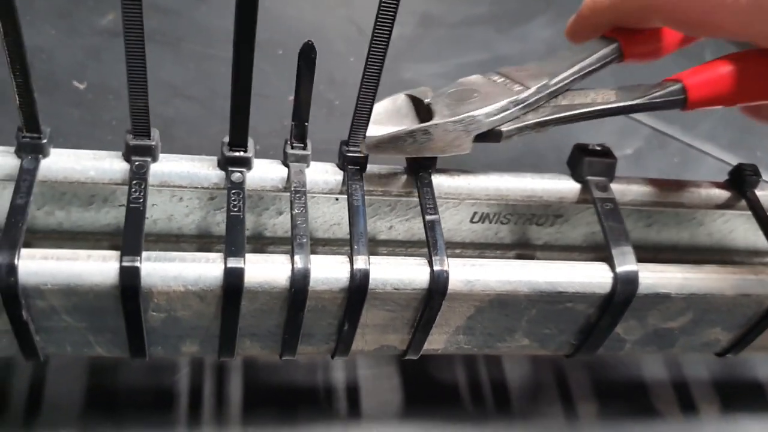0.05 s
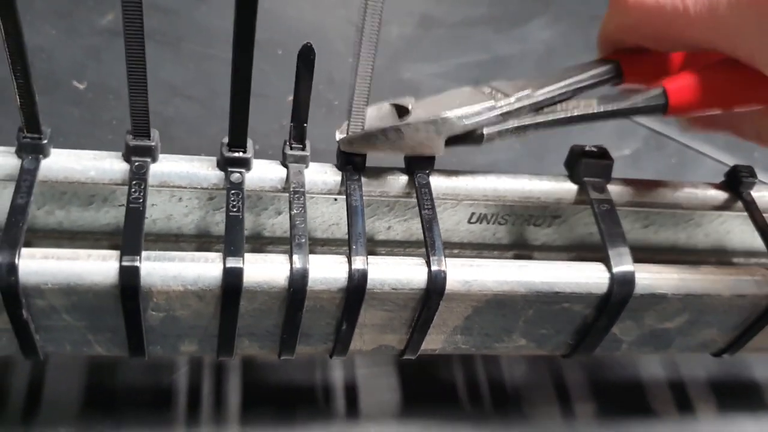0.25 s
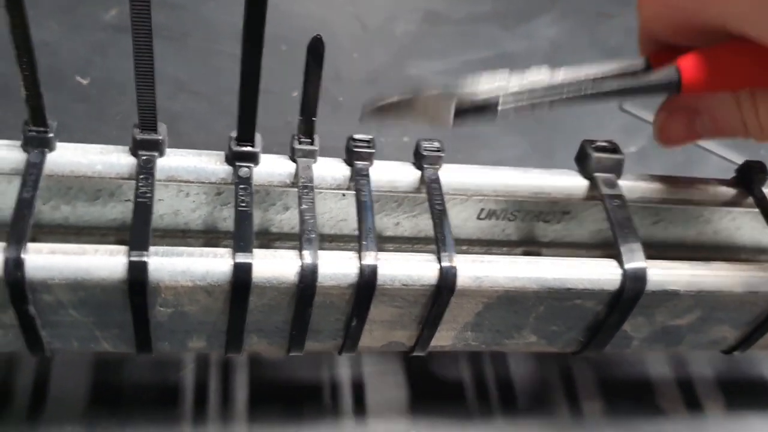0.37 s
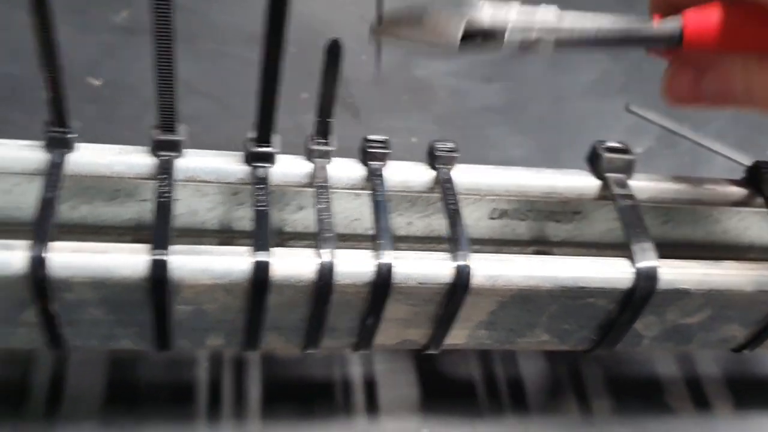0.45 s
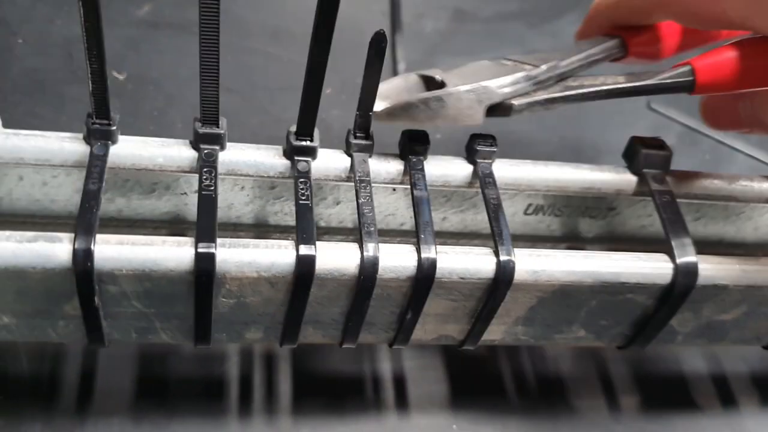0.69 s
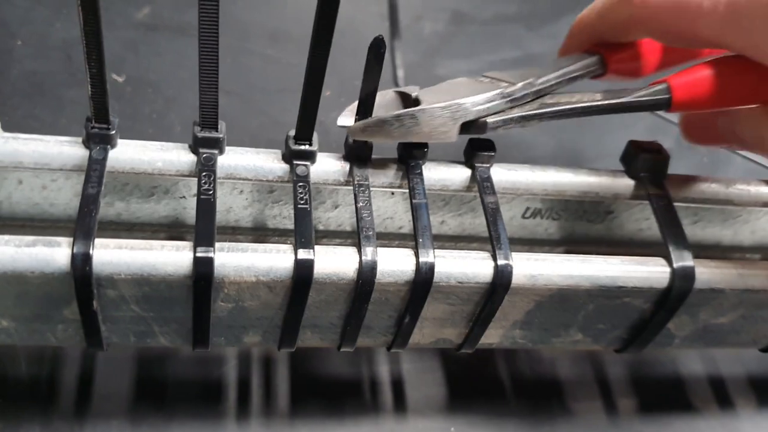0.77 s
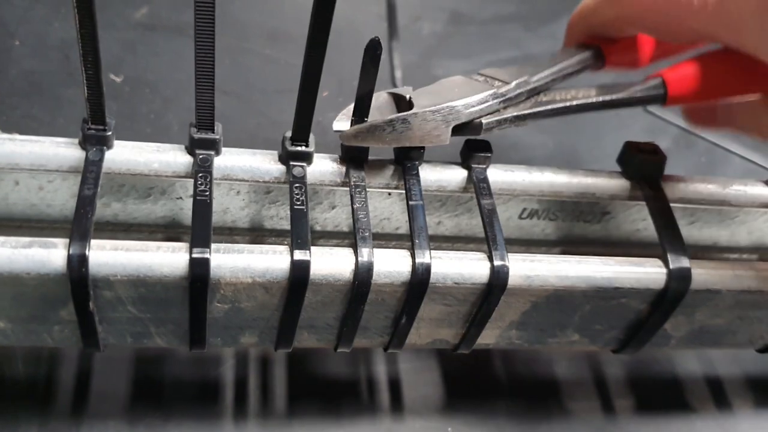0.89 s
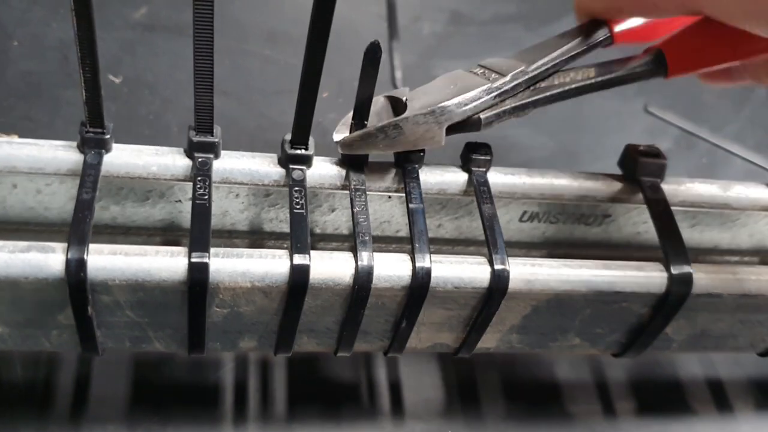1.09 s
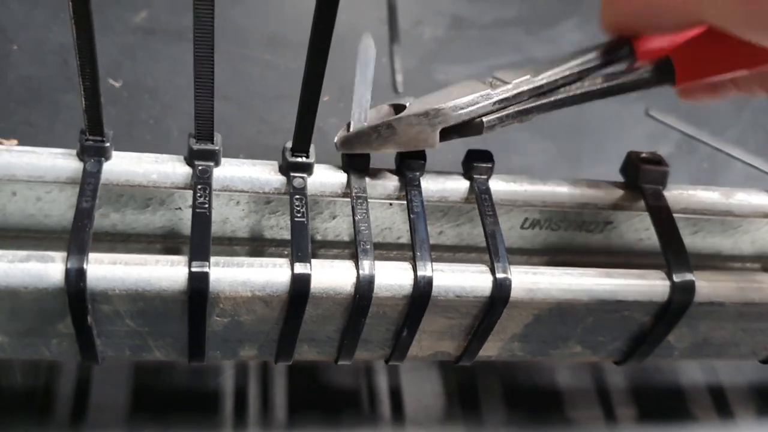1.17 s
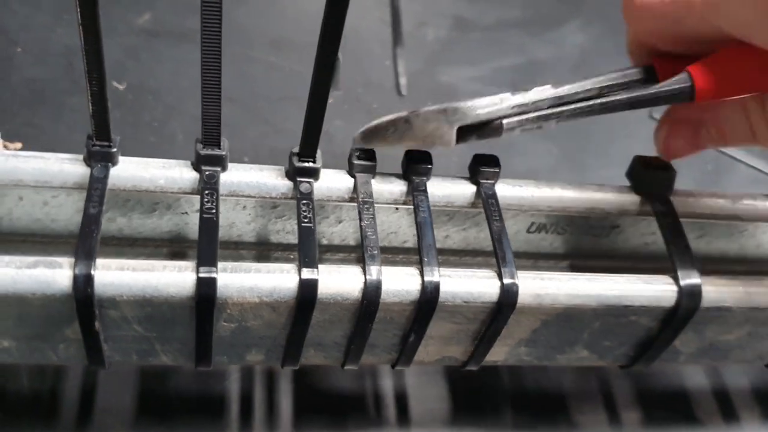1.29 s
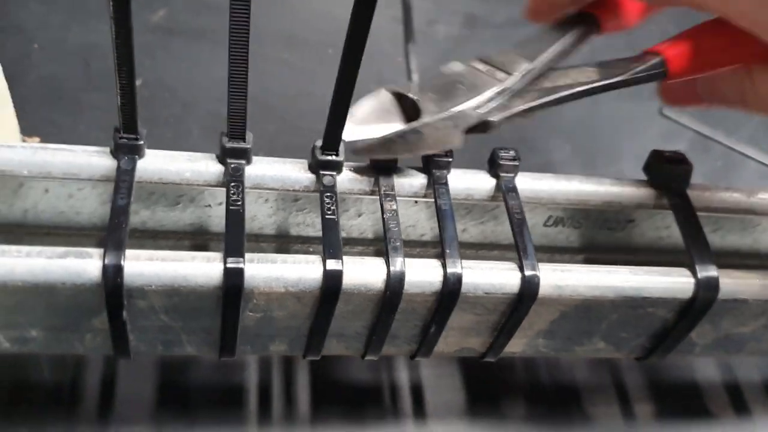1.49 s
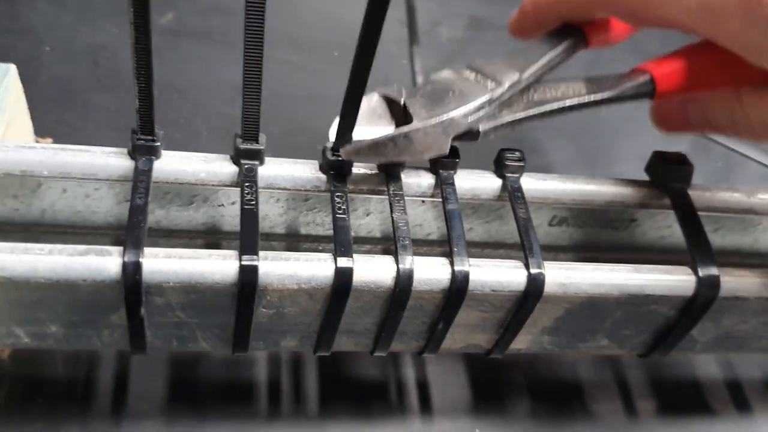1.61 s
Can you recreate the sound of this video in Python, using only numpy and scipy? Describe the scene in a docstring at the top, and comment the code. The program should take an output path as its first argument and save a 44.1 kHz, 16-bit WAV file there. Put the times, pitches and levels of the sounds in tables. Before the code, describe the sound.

Cutters snip two plastic cable ties on a steel channel, close and slightly left in a quiet room. Soft knocks and ticks lead to a sharp crack at 0.4 seconds, with a ping, thump and brief metallic clatter. A faint air puff brushes the right side, and the offcut patters down around 0.6 seconds. More knocks follow from 0.9 seconds, then a second, lighter snap rings briefly at 1.3.

```python
"""Cutters snip two plastic cable ties on a steel channel, close by in a quiet room.
Each tie snaps with a crack, the jaws ping, and the steel thumps and rings. Before each cut
the jaws knock on the channel as they find the tie, then bite with small ticks.
The first offcut lands with a patter, and a puff of air brushes the right microphone
as the hand jerks away."""
import sys
import numpy as np
from scipy import signal
from scipy.fft import rfft, irfft
from scipy.io import wavfile

SR = 44100
rng = np.random.default_rng(int(sys.argv[2]) if len(sys.argv) > 2 else 0)


def master(y):
    """Save y as 16-bit WAV."""
    cut = np.clip(np.atleast_2d(y).T, -1, 1)
    pcm = np.round(cut * 32767)  # scale
    wavfile.write(sys.argv[1], SR, pcm.astype(np.int16))


N = 72765
T = np.arange(int(SR * .9)) / SR  # seconds since one sound began
SNAP_RISE_S = 0.000298

# The two cuts. Each row: start in seconds, crack level in dB, crack length in seconds, ping level in dB,
# shimmer pitch and width in Hz, shimmer level in dB, thump level in dB, push pitch in Hz,
# push fade time in seconds, clatter level in dB.
CUTS = [(0.4262, 6, 0.001, 1.5, 7250, 560, -8, -3, 206, 0.042, 8.5),
        (1.3193, 4, 0.00147, 1.5, 7880, 221, -11.5, -5, 251.7, 0.081, -1)]


def amp(db):
    """Turns decibels (dB) into a number to multiply by."""
    return 10 ** (np.asarray(db) / 20)


def unit(x):
    """Scales a sound to an energy of 1."""
    return x / np.sqrt(np.sum(x ** 2, -1, keepdims=True) + 1e-20)


def read(points, hz):
    """Reads between the rows of a table, giving every octave equal space."""
    row_hz, values = np.transpose(points)
    return np.interp(np.log(hz + 1), np.log(row_hz), values)


def fade(fade_s):
    """Dies away by 60 dB in the fade time."""
    return np.exp(-np.log(1000) * T / fade_s)


def rise(rise_s):
    """Climbs from silence toward full level."""
    return 1 - np.exp(-T / rise_s)


def add(mix, start, sound):
    """Mixes a sound in at a start time in seconds."""
    part = mix[..., max(round(start * SR), 0):][..., :sound.shape[-1]]
    part += sound[..., :part.shape[-1]]


def colour(x, points, tilt_db=0):
    """Shapes the tone with a table of levels, tilted by tilt_db per octave around 4 kHz."""
    hz = abs(np.fft.fftfreq(4096, 1 / SR))
    octaves = np.log2(np.maximum(hz, 500) / 4000)
    log_gain = np.log(amp(read(points, hz) + tilt_db * octaves))
    response = np.exp(np.conj(signal.hilbert(log_gain)))  # never rings ahead of a hit
    taps = np.fft.ifft(response).real[:len(hz) // 2]
    return signal.fftconvolve(x, taps[None] if x.ndim > 1 else taps, axes=-1)[..., :x.shape[-1]]


def diffuse(count, alike_hz=450):
    """Noise at two microphones, alike in the bass only."""
    left, other = rfft(rng.standard_normal((2, count)))
    same = 1 / (1 + (np.fft.rfftfreq(count, 1 / SR) / alike_hz) ** 2)
    return irfft(np.array([left, same * left + np.sqrt(1 - same ** 2) * other]), count)


def room_noise(level_db=-57):
    """The quiet room; the right microphone hears less of its hiss."""
    # The noise's tone, then the change on the right. Each row: frequency in Hz, boost or cut in dB.
    tone = [(20, -21), (60, 5), (120, -9.5), (250, 10), (400, -13.5), (900, -17), (1500, -9.5),
            (3000, -20.5), (4200, -24), (6500, -19), (10000, -37.5), (16000, -37)]
    right_tone = [(60, -1.5), (300, -4), (700, -1.5), (1500, -20.5), (3200, -16.5), (6500, -22),
                  (10000, -2), (16000, 2.5)]
    left, right = amp(level_db) * np.sqrt(N) * unit(colour(diffuse(N), tone))
    return np.array([left, colour(right, right_tone)])


def room_echo(x):
    """Sound comes back from all sides, each frequency dying at its own speed."""
    # How long the room rings. Each row: frequency in Hz, fade time in seconds.
    fade_times = [(80, 0.37), (250, 0.25), (700, 0.61), (3000, 0.59), (7000, 0.38), (14000, 0.5)]
    # How much it sends back. Each row: frequency in Hz, level in dB.
    tone = [(60, 4), (250, -7.5), (600, -9), (1500, -8), (3200, -4.5), (7000, -11), (12000, -16)]
    hz, t, bands = signal.stft(diffuse(len(T)), SR, nperseg=256)
    fade_s = read(fade_times, hz)[:, None]
    equal_energy = np.sqrt(2 * np.log(1000) / (fade_s * SR))
    bands = bands * np.exp(-np.log(1000) * t / fade_s) * equal_energy
    build_up = 1 - np.exp(-(T / .006) ** 2)
    tail = signal.istft(bands, SR, nperseg=256)[1][:, :len(T)] * build_up
    return signal.fftconvolve(x, colour(tail, tone), axes=1)[:, :N]


def air_puffs(roughness=0.45):
    """Low flutters of air as the hand moves near the microphones."""
    # The puffs. Each row: peak time and width in seconds, pitch in Hz, left and right levels in dB.
    puffs = [(0.307, 0.032, 72, -48.5, -47), (0.39, 0.021, 62.4, -37, -40),
             (0.463, 0.031, 69.3, -44.5, -41.5), (0.568, 0.026, 61, -42, -25),
             (0.738, 0.023, 61.6, -60, -41.5), (1.222, 0.022, 75, -45.5, -48.5)]
    out = np.zeros((2, N))
    for peak, width, hz, left_db, right_db in puffs:
        t = np.arange(N) / SR - peak
        octave = signal.butter(2, [hz / np.sqrt(2), hz * np.sqrt(2)], "band", fs=SR, output="sos")
        swirls = signal.sosfilt(octave, rng.standard_normal((2, N)))
        flutter = np.cos(2 * np.pi * hz * t) + roughness * swirls / swirls.std()
        out += amp([[left_db], [right_db]]) * flutter / (1 + (t / width) ** 2) ** 1.3
    return out


def fracture(length_s, grain=0.89):
    """Plastic gives way in a quick run of tiny breaks."""
    t = T[:SR // 16]
    shape = rise(SNAP_RISE_S)[:len(t)] * np.exp(-t / length_s)
    breaks = rng.standard_normal(len(t)) * np.exp(grain * rng.standard_normal(len(t))) * shape
    for _ in range(3):  # even out all frequencies, then make the burst short again
        spectrum = rfft(breaks)
        breaks = irfft(spectrum / (abs(spectrum) + 1e-12), len(t)) * np.exp(-(t / (4 * length_s)) ** 2)
    return unit(breaks)


def jaw_ping(tie):
    """The cutter jaws meet with a short, bright ping that changes with the grip."""
    # The jaws' tones. Each row: pitch in Hz, levels in dB at the first and second tie, fade in seconds.
    tones = [(1566, -12, 1, 0.014), (1940, -6.5, -1, 0.0089), (2245, -1.5, -12, 0.011),
             (3453, -12, 4, 0.011), (4490, -1, 2, 0.0072), (5170, -3, -17.5, .015), (6924, 4, 4.5, 0.0075),
             (7130, -4, -17, 0.01), (7920, -13, -1, .012), (9530, -7.5, 0.5, 0.0072)]
    ping = sum(amp(dbs[tie]) * unit(np.sin(2 * np.pi * (hz * T + rng.random())) * fade(fade_s))
               for hz, *dbs, fade_s in tones)
    return ping * rise(SNAP_RISE_S)


def ticks(ping_db=-15):
    """Plastic creaks under the blades, offcuts land, the cutters click."""
    # The ticks. Each row: start in seconds, level in dB, length in seconds, tilt in dB per octave.
    events = [(0.2823, -24.5, 0.0042, 6.5), (0.296, -41, 0.0036, -3), (0.3098, -17, 0.0062, -3.5),
              (0.349, -37, 0.0018, 16), (0.3638, -9.5, 0.0026, 6.5), (0.4218, -11, 0.0065, 8.5),
              (0.619, -13.5, 0.0013, 0.5), (0.626, -13.5, 0.0074, 1), (0.6318, -14, 0.0014, 3),
              (0.641, -26, 0.0009, 6), (0.785, -18, 0.0016, 3), (0.835, -27.5, 0.0019, 2),
              (1.038, -20, .003, -7.5), (1.198, -31, 0.0097, 6.5), (1.286, -33, 0.0023, 5.5),
              (1.3161, -8, 0.0011, -1), (1.528, -25, 0.00063, -1), (1.5367, -20, 0.0011, 1),
              (1.543, -28.5, 0.0029, 15)]
    # Their tone. Each row: frequency in Hz, boost or cut in dB.
    tone = [(100, -8.5), (700, 9), (2000, 3.5), (3700, -1), (5200, -0.5), (6800, -2), (9500, -12),
            (12500, -27.5), (16000, -37)]
    out = np.zeros((2, N))
    for start, db, length_s, tilt_db in events:
        breaks = fracture(length_s)
        ping = unit(signal.fftconvolve(breaks, jaw_ping(0))[:len(breaks)])
        plastic = unit(colour(breaks, tone, tilt_db))
        add(out, start, amp(db) * unit(plastic + amp(ping_db) * ping))
    return out


def thump(push_hz, push_fade_s, fade_share=1):
    """The pushed channel swings quickly, then sways; pressing on it shortens the sway to fade_share."""
    # Low tones of the thump: the room's slow boom (lowest three) and the channel's sway.
    # Each row: pitch in Hz, level in dB, fade time when free in seconds, rise time in seconds.
    tones = [(60.4, -48, 0.81, 0.034), (74.8, -27.5, 0.39, 0.025), (95, -38.5, 0.36, .015),
             (136, -28, 0.13, 0.0012), (169.3, -34.5, 0.57, 0.0037), (188.4, -28, 0.21, 0.0024),
             (228.1, -28.5, 0.39, 0.0035), (258, -21, 0.31, 0.0021), (298, -32.5, 0.42, 0.011)]
    t = T - 0.0033  # the push peaks at t = 0
    swell = np.where(t < 0, np.exp(-(t / 0.0026) ** 2), np.exp(-np.log(1000) * t / push_fade_s))
    push = amp(-16) * np.cos(2 * np.pi * push_hz * t) * swell * np.minimum(T * 1000, 1)
    lows = sum(amp(db) * np.cos(2 * np.pi * hz * t) * fade(fade_s * fade_share) * rise(rise_s)
               for hz, db, fade_s, rise_s in tones)
    return push + lows


def rattle(pitch_spread=0.028):
    """The channel rattles hollowly against its ties, at a slightly different pitch each time."""
    # The rattle's tones. Each row: usual pitch in Hz, level in dB.
    tones = [(335, -26), (402, -30), (436, -28.5), (486, -32), (555, -31.5), (700, -29.5)]
    out = 0
    for usual_hz, db in tones:
        hz = usual_hz * (1 + pitch_spread * rng.uniform(-1.3, 1))
        out += amp(db) * np.sin(2 * np.pi * (hz * T + rng.random()))
    return out * fade(.16) * rise(0.0014)


def clatter():
    """The channel's many short tones blur into noise."""
    # The clatter's tone. Each row: frequency in Hz, boost or cut in dB.
    tone = [(100, -9), (300, 15.5), (520, 5.5), (850, -5), (1450, 5), (1900, -1.5), (3200, 3), (3900, -8),
            (5400, -8), (7200, -6), (9300, -19), (13000, -19), (16000, -41)]
    burst = rng.standard_normal((2, len(T))) * fade(0.23)
    return unit(colour(burst, tone)) * rise(0.00065)


def steel_ring(tie):
    """The channel rings with clear tones, whose mix depends on the place struck."""
    # Steel tones. Each row: pitch in Hz, levels in dB at the first and second tie, fade in seconds.
    tones = [(658.5, -23.5, -35, 0.26), (1232, -32.5, -46, 0.4), (1424, -32.5, -38, 0.29),
             (1555, -23.5, -29.5, 0.16), (2498, -36, -62, 0.4), (2560, -40, -57, 0.19),
             (2796, -23.5, -35.5, 0.22), (2910, -29, -33, 0.2), (3005, -38.5, -43.5, 0.4),
             (3129, -45, -40, 0.41), (3313, -31.5, -43, 0.39), (3295, -26.5, -31, 0.33),
             (3378, -36, -41, .18), (3976, -35, -49, 0.13)]
    ring = sum(amp(dbs[tie]) * np.sin(2 * np.pi * (hz * T + rng.random((2, 1)))) * fade(fade_s)
               for hz, *dbs, fade_s in tones)
    return ring * rise(0.001)


def knocks(dull_above_hz=1383):
    """The jaws bump the channel softly: a thump, a hollow rattle and a dulled ring."""
    # The bumps. Each row: start in seconds, thump level in dB, push pitch in Hz, push fade in seconds,
    # share of the sway's free fade time, rattle level in dB, ring level in dB.
    events = [(0.014, -18, 235, 0.031, 0.82, -17, -16.5), (0.12, -33.5, 263, 0.047, 0.27, -36, -49),
              (0.2131, -11.5, 244, 0.031, 0.88, -12, -20.5), (0.283, -25, 240, 0.026, 0.95, -24.5, -27),
              (0.313, -14.5, 229, 0.059, 0.52, -12.5, -12.5), (0.3725, -13, 230, 0.12, 0.94, -21, -11.5),
              (0.8561, -12, 240, 0.023, 0.83, -24, -46), (1.041, -14, 208, 0.089, 0.58, -10.5, -16),
              (1.175, -26.5, 282, 0.019, 0.76, -21.5, -28.5), (1.199, -32.5, 253, 0.036, 0.91, -33, -21),
              (1.2867, -20.5, 188, 0.097, 1, -18, -19.5), (1.392, -15, 224, .025, 0.16, -26, -41)]
    noisy, swaying, ringing = np.zeros((3, 2, N))
    dull = signal.butter(2, dull_above_hz, fs=SR)
    for start, thump_db, push_hz, push_fade_s, fade_share, rattle_db, ring_db in events:
        add(noisy, start, amp(ring_db + 5) * signal.lfilter(*dull, clatter()))
        add(swaying, start, amp(thump_db) * thump(push_hz, push_fade_s, fade_share))
        add(swaying, start, amp(rattle_db) * rattle())
        add(ringing, start, amp(ring_db) * signal.lfilter(*dull, steel_ring(tie=1)))
    return np.array([noisy, swaying, ringing])


def shimmer(hz, width_hz):
    """A faint cluster of high tones lingers after the snap."""
    band = np.exp(-((np.fft.rfftfreq(len(T), 1 / SR) - hz) / width_hz) ** 2)
    cluster = irfft(rfft(rng.standard_normal((2, len(T)))) * band, len(T))
    return unit(cluster * fade(0.45))


def closing_jaws():
    """The jaws shut with a ping as each tie gives way."""
    out = np.zeros((2, N))
    for tie, (start, _, _, ping_db, *_) in enumerate(CUTS):
        add(out, start, amp(ping_db) * jaw_ping(tie))
    return out * amp([[0], [1]])  # left, right


def snips():
    """Each tie cracks, and the channel springs back and rings."""
    # The crack's tone. Each row: frequency in Hz, boost or cut in dB.
    tone = [(100, 1), (550, -0.5), (850, -11), (1300, -0.5), (1900, -3.5), (2600, -9), (3400, -4.5),
            (4600, -3.5), (5700, -6), (6900, 5.5), (8600, -7.5), (10500, -10), (13000, -6.5), (16000, -36)]
    noisy, swaying, ringing = np.zeros((3, 2, N))
    for tie, (start, crack_db, length_s, _, shimmer_hz, width_hz, shimmer_db,
              thump_db, push_hz, push_fade_s, clatter_db) in enumerate(CUTS):
        add(noisy, start, amp(crack_db) * unit(colour(fracture(length_s), tone)))
        add(noisy, start, amp(shimmer_db) * shimmer(shimmer_hz, width_hz) + amp(clatter_db) * clatter())
        add(ringing, start, steel_ring(tie))
        add(swaying, start - .0008, amp(thump_db) * thump(push_hz, push_fade_s))
    return np.array([noisy, swaying, ringing])


def scene(right_delay_s=.0003):
    """The work lies to the left, so the right microphone hears it later and duller."""
    # What the right side loses. Each row: frequency in Hz, change in dB.
    shade = [(50, -1.5), (230, -1), (480, -5.5), (800, -8), (1500, -13), (3200, -20), (7500, -18.5),
             (11000, -7), (16000, -4.5)]
    noisy, swaying, ringing = snips() + knocks()
    ticking, pings = ticks(), closing_jaws()
    into_room = noisy + amp(-4) * swaying + amp(-10.5) * ringing + amp(-0.5) * ticking + amp(-7) * pings
    left, right = noisy + swaying + ringing + ticking + pings + room_echo(into_room)
    samples = np.arange(N)
    right = np.interp(samples - round(right_delay_s * SR), samples, colour(right, shade))
    return np.array([left, right]) + room_noise() + air_puffs()


def record(dry, top_hz=16000):
    """Cuts away the very highest treble."""
    taps = signal.firwin(255, top_hz, window=("kaiser", 8), fs=SR)
    return signal.oaconvolve(dry, taps[None], "same")


dry = scene()
out = record(dry)
master(out)
```